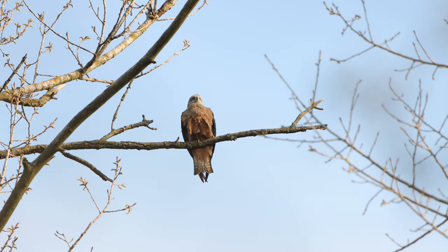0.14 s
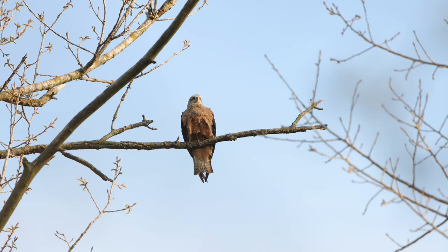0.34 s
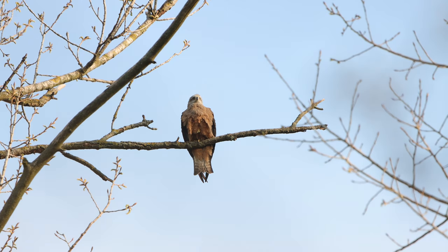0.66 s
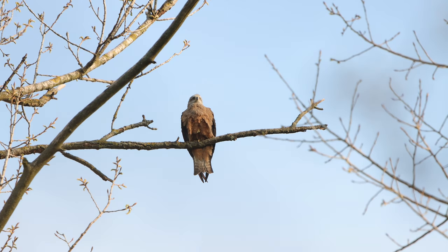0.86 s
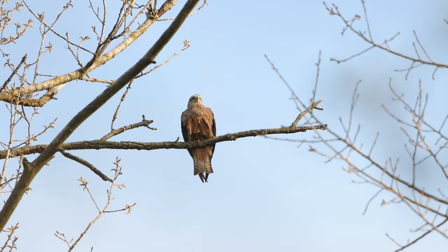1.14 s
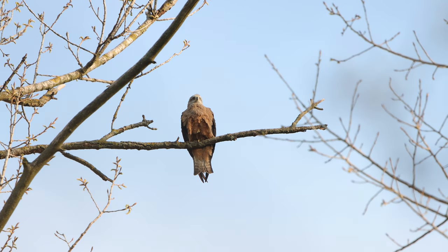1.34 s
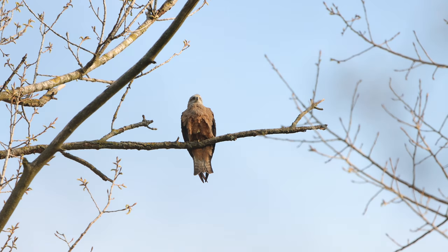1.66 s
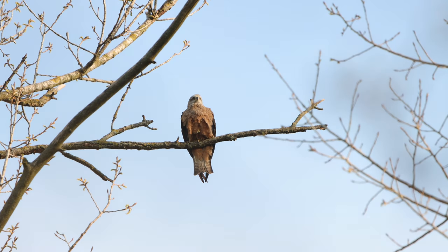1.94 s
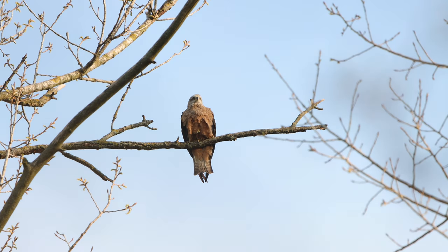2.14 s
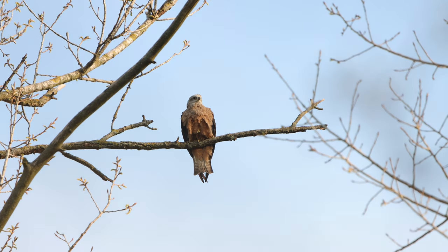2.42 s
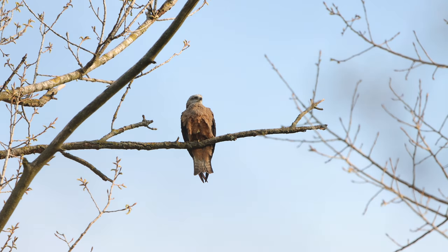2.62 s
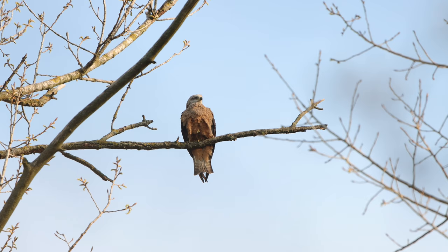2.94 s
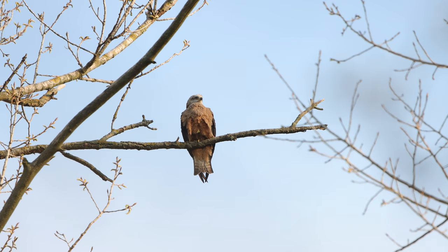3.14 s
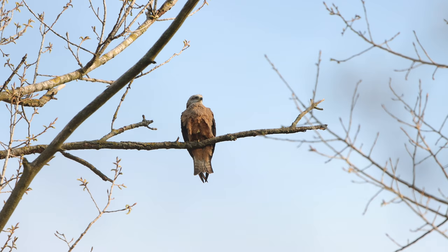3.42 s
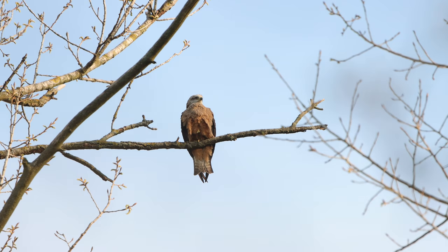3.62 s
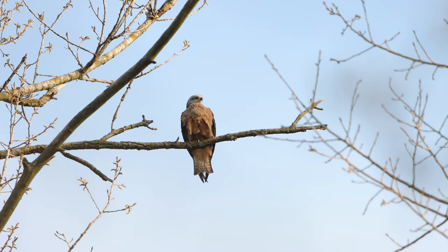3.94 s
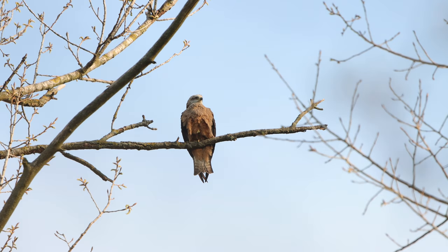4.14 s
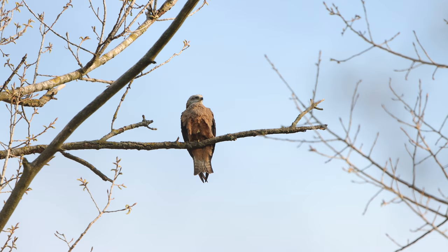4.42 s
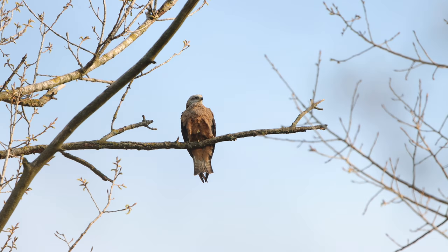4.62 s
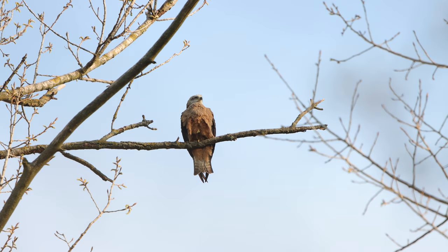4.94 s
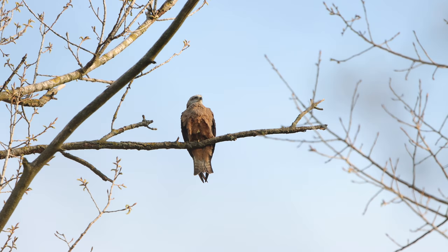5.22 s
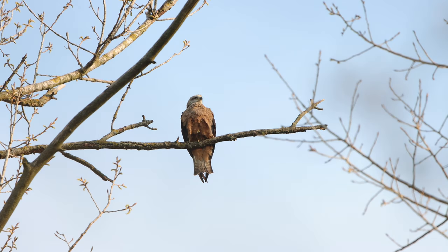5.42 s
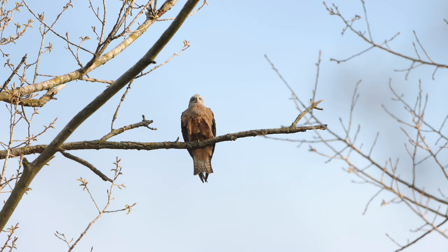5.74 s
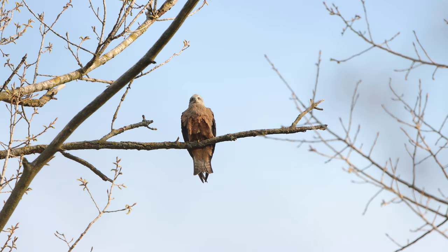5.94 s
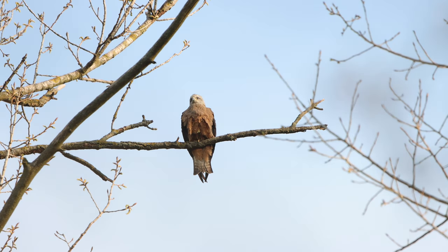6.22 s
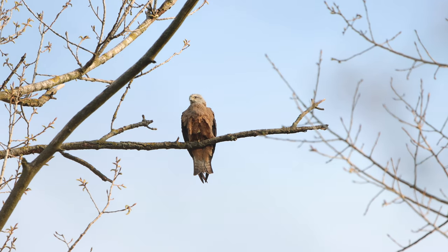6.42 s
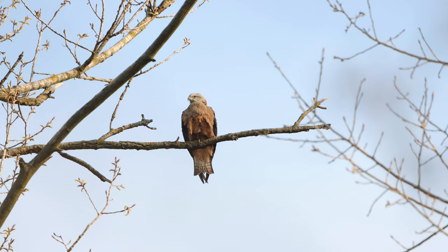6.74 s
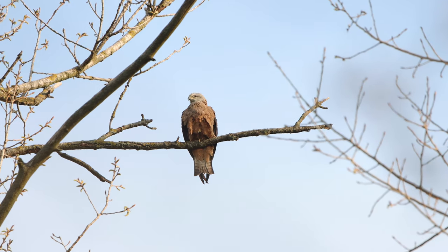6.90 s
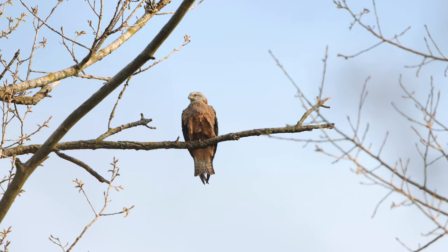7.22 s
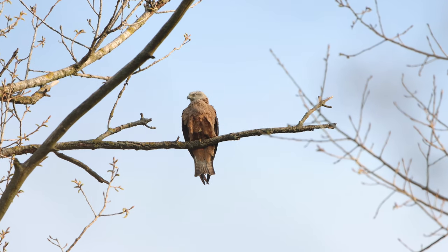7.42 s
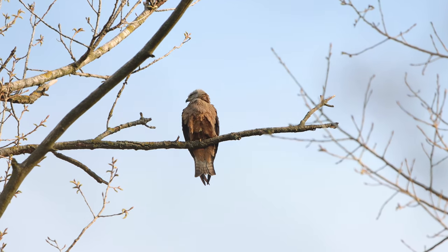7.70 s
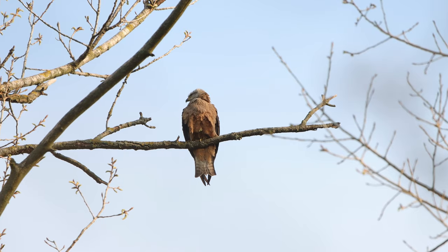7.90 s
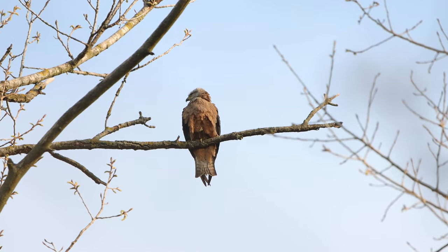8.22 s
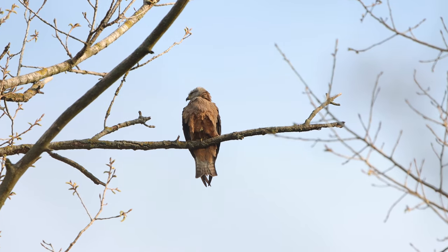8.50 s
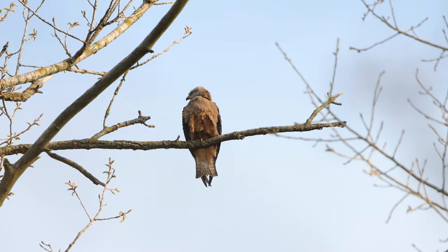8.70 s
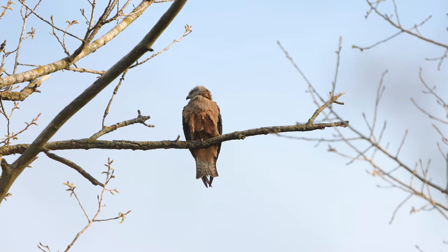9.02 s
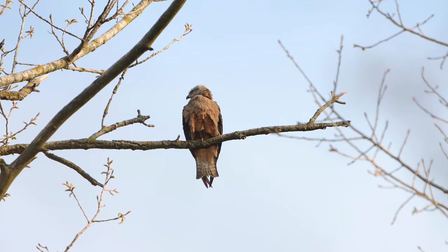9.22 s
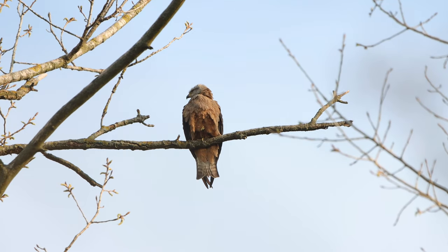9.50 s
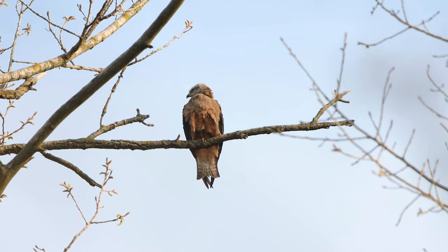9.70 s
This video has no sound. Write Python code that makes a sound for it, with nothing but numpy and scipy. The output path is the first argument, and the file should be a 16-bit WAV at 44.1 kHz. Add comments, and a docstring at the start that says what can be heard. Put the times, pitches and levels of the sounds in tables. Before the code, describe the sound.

In open air among bare trees, a low far engine tone wavers in strength throughout, with a soft drifting traffic rumble and faint wide hiss. At 0 s three quick thin falling whistles sound. From 0.3 s the nearest bird begins with small upsweeps and peeps, alternates zigzags and falling slurs from 0.9 to 1.5 s, rises to three loud arched whistles at 1.6-2 s, and ends in a buzz and quaver near 2.4 s. From 2.4 to 4 s another bird, to the left, repeats a clear high note and lower fluttering note four times, over thin whistles and a short rising buzz near 3.7 s. Faint far calls and a pulsing whistle fill 4-6 s, with a tiny twig tick near 5.8 s. The near phrase returns louder from 6.1 to 8.5 s, arches at 7.6-7.9 s, buzz at 8.3 s. Thin faint whistles and ticks last until nearly 10 s, with natural woodland reverberation.

```python
"""Among bare trees, thin falling whistles open; nearest the microphones a bird gives a long phrase of upsweeps,
zigzags with falling slurs, loud arches and a closing buzz. A see-saw of two notes follows, off to the left, over
soft slurs, a short buzz and far calls; then the near phrase returns, louder, and thin whistles last to the end.
Voices are wavering tones scattered by trunks and twigs, with a few ticks of wood. Throughout lie an engine's
low tone, traffic as a drifting band of noise, and the rumble and hiss of shaped noise."""
import sys
import numpy as np
from scipy import signal
from scipy.fft import rfft, irfft, next_fast_len
from scipy.io import wavfile
from scipy.ndimage import uniform_filter1d, map_coordinates

SR = 44100
rng = np.random.default_rng(int(sys.argv[2]) if len(sys.argv) > 2 else 0)


def output_pcm(signal):
    """Save a mono or channel-first signal as 16-bit PCM at the path in sys.argv[1].

    Samples are clipped to [-1, 1] before scaling.
    """
    pcm = np.clip(np.atleast_2d(signal).T, -1, 1) * 32767
    wavfile.write(sys.argv[1], SR, np.round(pcm).astype(np.int16))


N = 434826  # samples in the scene


def amp(db):
    """Decibels to a linear factor."""
    return 10 ** (np.asarray(db) / 20)


def unit(x):
    """Scale to an RMS of one."""
    return x / np.sqrt(np.mean(x ** 2) + 1e-20)


def along(points, hz):
    """Read (frequency [Hz], value) points on a log frequency axis."""
    f, v = np.transpose(points)
    return np.interp(np.log(hz + 1), np.log(f + 1), v)


def curves(rows):
    """One value per sample of the whole scene for each column after the time."""
    s, *cols = np.transpose(rows)
    return [np.interp(np.arange(N) / SR, s, c) for c in cols]


def gesture(rows, size=110):
    """One note's columns per sample, with the corners rounded as muscles would (size in samples)."""
    s, *cols = np.transpose(rows)
    t = np.arange(s[0], s[-1], 1 / SR)
    return [uniform_filter1d(np.interp(t, s, c), size) for c in cols]


def wobble(rate, n):
    """A smooth random curve of n samples, rate knots a second."""
    knots = rng.standard_normal(int(n * rate / SR) + 4)
    return map_coordinates(knots, [np.arange(n) * rate / SR])


def filtered(x, response):
    """Multiply the spectrum of x by a response of frequency."""
    m = next_fast_len(N + SR // 2)
    return irfft(rfft(x, m) * response(np.fft.rfftfreq(m, 1 / SR)), m)[..., :N]


def add(track, s, sound):
    """Mix a sound into a track at time s."""
    part = track[round(s * SR):][:len(sound)]
    part += sound[:len(part)]


ATTACK_S = .0028  # soft edge of a note


def whistle(hz, db, jitter=0.012, second_db=-45, third_db=-46, release_s=ATTACK_S):
    """The syrinx: a nearly pure tone whose pitch wavers by a share (jitter) and whose edges are soft."""
    n = len(hz)
    t = np.arange(n) / SR
    phase = 2 * np.pi * np.cumsum(hz * (1 + jitter * wobble(900, n))) / SR
    edges = np.clip(np.minimum(t / ATTACK_S, t[::-1] / release_s), 0, 1)
    gate = np.sin(np.pi / 2 * edges) ** 2
    tone = np.sin(phase) + amp(second_db) * np.sin(2 * phase) + amp(third_db) * np.sin(3 * phase)
    return np.sqrt(2) * amp(db) * gate * tone


def glide(length, start_hz, end_hz, db, sag, crest, start_db, end_db):
    """Pitch and level of a note: sag above 1 bends the pitch early, below 1 late; db holds at the crest."""
    u = np.linspace(0, 1, int(length * SR))
    before = start_db * (1 - u / crest) ** 2
    after = end_db * ((u - crest) / (1 - crest)) ** 2
    return end_hz + (start_hz - end_hz) * (1 - u) ** sag, db + np.where(u < crest, before, after)


def flutter(rate_hz, n, unrest):
    """The pitch or level shake of a buzzing or pulsing note, its rate wandering by a share (unrest)."""
    return np.sin(2 * np.pi * np.cumsum(rate_hz * (1 + unrest * wobble(60, n))) / SR)


# how long the trees ring on: (frequency [Hz], time to fall 60 dB [s])
TREE_DECAY = [(1500, 0.24), (3500, 0.55), (7000, 0.78), (14000, 0.98)]


def woods(x, pan_db, twigs_db, tail_db, twigs_t60):
    """Direct sound, a dense quick scatter from nearby branches and the slower answer of the trees."""
    hz, t, z = signal.stft(rng.standard_normal((2, SR)), SR, nperseg=256)
    decay = amp(-60 * t / along(TREE_DECAY, hz)[:, None])
    build_up = 1 - np.exp(-t / 0.0042)
    tail = signal.istft(z * decay * build_up, SR, nperseg=256)[1]

    lag = np.arange(tail.shape[1]) / SR
    scatter = rng.standard_normal(tail.shape) * amp(-60 * lag / twigs_t60) * (1 - np.exp(-lag / 0.0027))

    # scatter and tail are set in dB against the direct sound
    paths = amp(tail_db) * tail / np.linalg.norm(tail[0])
    paths += amp(twigs_db) * scatter / np.linalg.norm(scatter[0])
    paths[:, 0] += 1
    # positive pan_db leans left
    return signal.fftconvolve(x[None], paths, axes=1)[:, :N] * amp([[pan_db / 2], [-pan_db / 2]])


def near_bird():
    """Closest to the microphones: two phrases grow from thin upsweeps to loud arches and end in a buzz."""
    voice = opening() + trill() + arches() + closing() + asides()
    # the pressure behind the notes is uneven, so each stroke trembles in its own way
    voice *= amp(0.71 * wobble(160, N))
    # a faint bright hiss, shaped noise, follows the level of the notes
    loudness = np.sqrt(np.abs(uniform_filter1d(voice ** 2, size=220)))
    bright = [(800, -2.0), (8000, 7), (13000, 2)]  # (frequency [Hz], gain [dB])
    hiss = filtered(rng.standard_normal(N), lambda hz: amp(along(bright, hz)))
    voice += amp(-42) * loudness * hiss
    return woods(voice, pan_db=-2.0, twigs_db=-3.5, tail_db=-8.5, twigs_t60=0.1)


def slur(length, start_hz, end_hz, db):
    """A clean falling note, its pitch dropping fastest at the start."""
    return whistle(*glide(length, start_hz, end_hz, db, sag=1.7, crest=0.32, start_db=-15.5, end_db=-21.5))


def rasp(length, end_hz, db, start_hz=2200):
    """A rising note made rough by strong random pitch wavering."""
    note = glide(length, start_hz, end_hz, db, sag=1.5, crest=.5, start_db=-6.5, end_db=-9)
    return whistle(*note, jitter=0.12, second_db=-25)


# shape of an upsweep about its knee: (time from the knee [s], pitch [Hz], relative level [dB])
UPSWEEP_SHAPE = [(-.034, 5650, -9.5), (-.012, 5500, 4.5), (0, 5750, 5.5), (.008, 7200, -5),
                 (0.012, 7750, -9.5), (0.026, 6700, 3)]
# upsweeps, each led by a rasp: (time of the knee [s], level [dB], pitch [ratio], rasp level [dB])
UPSWEEP_NOTES = [(.377, -42.5, 1.0, -50.5), (.533, -34, .96, -40), (6.188, -45, 1.105, -49),
                 (6.357, -37.5, 1, -41), (6.506, -35, 1.016, -42)]
RASP_LEAD_S, RASP_S, RASP_TO_HZ = .061, 0.011, 4390
# quick falling peeps: (time [s], level of the first [dB], start pitch [Hz], end pitch [Hz])
PEEPS = [(.631, -28.5, 5380, 4683), (6.595, -27.5, 5110, 4440)]
PEEP_EVERY_S, PEEP_S, PEEP_GROWS_DB = .0455, 0.0281, 5


def opening(count=3):
    """Rasps and thin upsweeps, then a run of peeps of which the first is softer."""
    voice = np.zeros(N)
    hz, db = gesture(UPSWEEP_SHAPE)
    for s, level, ratio, rasp_db in UPSWEEP_NOTES:
        add(voice, s - RASP_LEAD_S, rasp(RASP_S, RASP_TO_HZ, rasp_db))
        add(voice, s + UPSWEEP_SHAPE[0][0], whistle(hz * ratio, db + level, second_db=-25))
    for s, level, start_hz, end_hz in PEEPS:
        for k in range(count):
            peep_db = level + PEEP_GROWS_DB * (k > 0)
            add(voice, s + k * PEEP_EVERY_S, slur(PEEP_S, start_hz, end_hz, peep_db))
    return voice


# shape of a zigzag about its lowest turn: (time from the turn [s], pitch [Hz], relative level [dB])
ZIGZAG_SHAPE = [(-.036, 5700, -27), (-.027, 7000, -23), (-.019, 6200, -20), (-.015, 5800, -8),
                (-.006, 5300, -10), (-.003, 4500, -2), (0, 3350, 0), (.003, 4500, 1), (.008, 4850, -2),
                (.015, 4550, -17)]
# zigzags, each followed by a falling slur: (time of the turn [s], zigzag level [dB], time from the turn
# to the slur [s], slur length [s], slur start pitch [Hz], slur end pitch [Hz], slur level [dB])
ZIGZAG_SLURS = [ (0.88, -21.5, .025, .036, 4170, 3190, -18), (1.028, -25, .023, .031, 4090, 2783, -15.5),
                (1.171, -25, .026, 0.033, 3937, 2670, -17), (1.308, -26, 0.032, .038, 4037, 2610, -17.5),
                (1.453, -23, .023, .042, 4510, 2455, -18), (6.811, -25, .024, .05, 4100, 3394, -20),
                (6.972, -24.5, 0.026, .03, 4106, 3252, -17.5),
                (7.130, -22.5, .029, .028, 4110, 2950, -14.5), (7.278, -18, .023, 0.042, 4024, 2643, -14),
                (7.42, -17, 0.032, .027, 4500, 2710, -11)]


def trill():
    """Zigzag and slur alternate, the slurs mostly reaching lower as the phrase goes on."""
    voice = np.zeros(N)
    hz, db = gesture(ZIGZAG_SHAPE)
    for s, level, slur_after, *fall in ZIGZAG_SLURS:
        add(voice, s + ZIGZAG_SHAPE[0][0], whistle(hz, db + level, jitter=0.05, second_db=-34))
        add(voice, s + slur_after, slur(*fall))
    return voice


# an arch holds low, climbs and drops: (time from the drop [s], pitch [Hz], relative level [dB])
ARCH_SHAPE = [(-.069, 3150, -14), (-.052, 3060, -5), (-.045, 3080, -5), (-.037, 3220, 1), (-.025, 3800, 0),
              (-.017, 4850, -4), (-.011, 5050, -3), (-.004, 5050, -5), (.004, 3450, -1), (.013, 2720, -6),
              (.022, 2350, -18), (.033, 1800, -34)]
# three arches crown each phrase: (time of the drop [s], climb stretch [ratio], drop stretch [ratio],
# level [dB], lift of the top [Hz], change at the top [dB], change in the low lead-in [dB], flick level [dB])
ARCHES = [(1.661, 0.99, 1.1, -18.5, 377.5, -14.5, -12, -39.5),
          (1.839, 1.11, 1.1, -19, 401.5, -13.5, -10.5, -44),
          (1.991, 0.88, 1.05, -18.5, 86.5, -4, -3.5, -39), (7.614, 0.93, 1.03, -12.5, 60, 1, -3, -23),
          (7.78, 1.03, 1.08, -12, -77.5, 1, 2.5, -19.5), (7.94, 0.91, 1, -12.5, 28.5, -1, 0.5, -25)]
# a steep downward flick leads each arch; its lead stretches with the climb
FLICK_LEAD_S, FLICK_S, FLICK_FROM_HZ, FLICK_TO_HZ = .079, 0.0044, 8300, 4500


def arches(top_from_hz=3600, top_hz=5000):
    """A flick, then a loud arch whose top varies in height and strength."""
    voice = np.zeros(N)
    t, pitch, shape_db = np.transpose(ARCH_SHAPE)
    for s, climb, drop, level, lift_hz, top_db, lead_db, flick_db in ARCHES:
        stretched = t * np.where(t < 0, climb, drop)
        hz, db = gesture(np.transpose([stretched, pitch, shape_db]))
        top = np.clip((hz - top_from_hz) / (top_hz - top_from_hz), 0, 1)
        lead = np.interp(t[0] + np.arange(len(hz)) / SR / climb, t[2:4], [1, 0])
        db = db + level + top_db * top + lead_db * lead
        add(voice, s - climb * FLICK_LEAD_S, slur(FLICK_S, FLICK_FROM_HZ, FLICK_TO_HZ, flick_db))
        add(voice, s + climb * t[0], whistle(hz + lift_hz * top, db, jitter=0.012))
    return voice


BUZZ_RATE_HZ, QUAVER_RATE_HZ = 172, 60
# rough rising squeaks after the arches: (time [s], length [s], end pitch [Hz], level [dB])
SQUEAK_NOTES = [(2.075, 0.039, 8330, -36.5), (2.162, .026, 7530, -37), (8.027, .014, 7210, -26.5),
                (8.106, 0.0079, 6750, -29)]
# the closing buzz, an arch sinking into a low quaver: (time from the drop [s], pitch [Hz], relative level [dB])
BUZZ_SHAPE = [(-.064, 2100, -12), (-.054, 2600, 1), (-.046, 3200, -6), (-.027, 4450, -3), (-.004, 4500, -8),
              (.004, 3260, 1), (.021, 2360, -1), (.036, 2520, -6), (.085, 2370, -7), (.125, 2290, -10),
              (.147, 2100, -31)]
# a buzzing slur and the buzz close each phrase: (time of the drop [s], level [dB], change in the climb [dB],
# brief change within the climb [dB], slur start pitch [Hz], slur level [dB])
CLOSING_NOTES = [(2.388, -23, -2.5, -12.5, 3780, -21.5), (8.333, -19.5, -1, 0, 4440, -15.5)]
BUZZ_SLUR_LEAD_S, BUZZ_SLUR_S, BUZZ_SLUR_TO_HZ = .141, .044, 2580
BUZZ_SWING, SLUR_SWING, QUAVER_SWING = .16, .04, .07  # shares of the pitch
BUZZ_BUILDS_S, QUAVER_AFTER_S = .025, .021
QUAVER_SWING_DB, QUAVER_ROUGH = 3, .05  # level swing; added pitch jitter as a share
CATCH_LEAD_S, CATCH_S = .044, .007  # the brief level change: time before the drop, width


def closing():
    """Squeaks, a buzzing slur, then an arch that buzzes as it climbs, drops cleanly and ends in a rough quaver."""
    voice = np.zeros(N)
    for s, length, end_hz, level in SQUEAK_NOTES:
        add(voice, s, rasp(length, end_hz, level))
    for s, level, climb_db, catch_db, slur_hz, slur_db in CLOSING_NOTES:
        hz, db = glide(BUZZ_SLUR_S, slur_hz, BUZZ_SLUR_TO_HZ, slur_db,
                       sag=.85, crest=.45, start_db=-14, end_db=-14)
        shake = SLUR_SWING * flutter(BUZZ_RATE_HZ, len(hz), unrest=.06)
        add(voice, s - BUZZ_SLUR_LEAD_S, whistle(hz * (1 + shake), db))

        hz, db = gesture(BUZZ_SHAPE)
        t = BUZZ_SHAPE[0][0] + np.arange(len(hz)) / SR
        climb = np.clip(-t / .005, 0, 1)
        tail = np.clip((t - QUAVER_AFTER_S) / .005, 0, 1)
        build = np.clip((t - t[0]) / BUZZ_BUILDS_S, 0, 1)
        buzz = climb * build * flutter(BUZZ_RATE_HZ, len(t), unrest=.1)
        quaver = tail * flutter(QUAVER_RATE_HZ, len(t), unrest=.3)
        catch = np.exp(-((t + CATCH_LEAD_S) / CATCH_S) ** 2)
        db = db + level + climb_db * climb + catch_db * catch - QUAVER_SWING_DB * quaver
        hz = hz * (1 + BUZZ_SWING * buzz + QUAVER_SWING * quaver)
        add(voice, s + BUZZ_SHAPE[0][0], whistle(hz, db, jitter=0.017 + QUAVER_ROUGH * tail))
    return voice


# soft low slurs between the phrases: (time [s], length [s], start pitch [Hz], level [dB])
SOFT_SLURS = [(3.325, 0.032, 2950, -48.5), (4.483, .044, 3180, -41)]
# a lone rising buzz: (time [s], pitch [Hz], flutter swing [Hz], level [dB])
RISING_BUZZ = [(3.648, 2207, 150, -41), (3.668, 3060, 598, -43), (3.685, 3670, 241, -32),
               (3.698, 4240, 100, -32.5), (3.720, 4300, 60, -34)]


def asides():
    """Soft falling slurs and one fluttering, rising note in the pause between the phrases."""
    voice = np.zeros(N)
    for s, length, start_hz, level in SOFT_SLURS:
        add(voice, s, slur(length, start_hz, end_hz=2250, db=level))
    hz, swing, db = gesture(RISING_BUZZ)
    shaken = hz + swing * flutter(BUZZ_RATE_HZ, len(hz), unrest=.06)
    add(voice, RISING_BUZZ[0][0], whistle(shaken, db, jitter=0.0098))
    return voice


# pairs of notes: (time [s], high note length [s], high note level [dB], low note level [dB])
SEESAW_PAIRS = [(2.374, 0.08, -19.5, -29), (2.829, .13, -21, -28.5), (3.271, 0.093, -14, -24),
                (3.713, 0.11, -14, -26.5)]
SEE_FROM_HZ, SEE_TO_HZ, SAW_AFTER_S = 4626, 4434, 0.19
SEESAW_LEAD_S, SEESAW_RELEASE_S = 7e-5, .02  # lead between the microphones; end of a note


def seesaw_bird():
    """Off to the left, a clear high note alternates with a lower, finely fluttering one that swells and tapers."""
    high, low = np.zeros(N), np.zeros(N)
    for s, length, high_db, low_db in SEESAW_PAIRS:
        note = glide(length, SEE_FROM_HZ, SEE_TO_HZ, high_db, sag=4.5, crest=.35, start_db=-9, end_db=-11)
        add(high, s, whistle(*note, jitter=0.0012, second_db=-39, third_db=-40.5, release_s=SEESAW_RELEASE_S))
        hz, db = glide(.11, 3060, 3010, low_db, sag=1.5, crest=.53, start_db=-14, end_db=-14)
        shaken = hz + 110 * flutter(219.5, len(hz), unrest=0.069)
        add(low, s + SAW_AFTER_S, whistle(shaken, db, jitter=0.0054, release_s=SEESAW_RELEASE_S))
    both = woods(high, pan_db=7, twigs_db=-10, tail_db=-10, twigs_t60=.2)
    both = both + woods(low, pan_db=1.0, twigs_db=-4.5, tail_db=-4.5, twigs_t60=0.085)
    # it sits to one side, so its song reaches the left microphone first
    sides = np.array([[1], [-1]])
    return filtered(both, lambda hz: np.exp(1j * np.pi * hz * SEESAW_LEAD_S * sides))


# runs of quick thin falling notes: (time [s], level [dB])
QUICK_FALLS = [(0, -34), (.085, -35.5), (.195, -38), (2.646, -32.5), (2.736, -31.5), (2.83, -35),
               (2.938, -36.5)]
FALL_S, FALL_FROM_HZ, FALL_TO_HZ = 0.057, 7300, 5930
# a sag drops quickly and then settles: (position [share of its length], pitch [Hz], relative level [dB])
SAG_SHAPE = [(0, 7960, -6), (.18, 7493, -1.5), (.6, 7200, -1.5), (1, 7010, -0.5)]
# thin whistles that sag: (time [s], length [s], level [dB])
SAGGING_WHISTLES = [(1.466, 0.042, -45.5), (2.118, .17, -33), (2.386, .17, -33.5), (7.185, .11, -46),
                    (7.40, 0.1, -43.5), (7.61, .11, -45), (8.05, .045, -39.5), (8.160, .085, -40.5),
                    (8.360, 0.098, -42), (8.553, .11, -40.5), (8.785, .2, -55)]
# stray faint calls: (time [s], length [s], start pitch [Hz], end pitch [Hz], level [dB],
# pitch unrest [share of the pitch])
STRAY_CALLS = [(4.821, 0.123, 3610, 3550, -69, 0.011), (5.659, 0.061, 4535, 4354, -62, 0.0091),
               (4.978, 0.1, 5070, 5300, -56.5, 0.0092), (5.114, 0.086, 4470, 3980, -54.5, 0.015),
               (5.96, .08, 4006, 4650, -61, 0.013), (6.025, 0.038, 5130, 5800, -60, .015),
               (6.077, 0.17, 5600, 3960, -59.5, 0.019), (8.75, .14, 5140, 5840, -46, .025),
               (8.763, 0.17, 3503, 3543, -59, 0.014), (8.994, .06, 2960, 2890, -59.5, .015),
               (9.068, 0.022, 4700, 6070, -57.5, .01), (9.262, .12, 4490, 3950, -58, 0.0088),
               (9.328, 0.15, 7160, 7160, -50, 0.0029)]


def thin_birds():
    """High whistles from further off, with more of the trees in them; quick notes waver more than long ones."""
    voice = np.zeros(N)
    for s, level in QUICK_FALLS:
        note = glide(FALL_S, FALL_FROM_HZ, FALL_TO_HZ, level, sag=1.5, crest=0.89, start_db=-1, end_db=-12)
        add(voice, s, whistle(*note, jitter=0.025))
    for s, length, level in SAGGING_WHISTLES:
        hz, db = gesture(np.array(SAG_SHAPE) * [length, 1, 1])
        add(voice, s, whistle(hz, db + level, jitter=0.0097))
    for s, *row, unrest in STRAY_CALLS:
        note = glide(*row, sag=1.6, crest=.55, start_db=-7, end_db=-7)
        add(voice, s, whistle(*note, jitter=unrest))
    return woods(voice, pan_db=-3.5, twigs_db=0, tail_db=-8, twigs_t60=0.32)


# hoarse calls from far away: (time [s], level [dB])
HOARSE_CALLS = [(3.0, -68), (3.65, -69), (4.3, -70)]


def far_birds(count=4):
    """Almost lost among the trees: a pulsing whistle, randomly placed chirps and low, unsteady hoarse calls."""
    voice = np.zeros(N)
    hz, db = glide(0.68, 5050, 5000, -62.5, sag=0.95, crest=0.92, start_db=-1.5, end_db=1)
    add(voice, 3.95, whistle(hz, db + 6 * flutter(9.4, len(hz), unrest=.05)))
    for when, length, pitch, fall in rng.random((count, 4)):
        start_hz = 3200 + 1900 * pitch
        end_hz = start_hz * (1.08 - 0.93 * fall)
        note = glide(0.0496 + 0.097 * length, start_hz, end_hz, -68.5,
                     sag=1, crest=0.2, start_db=-3.0, end_db=-16.0)
        add(voice, 4 + 5.7 * when, whistle(*note, jitter=.03))
    for s, level in HOARSE_CALLS:
        note = glide(0.55, 1210, 1170, level, sag=0.81, crest=0.36, start_db=2, end_db=-13.5)
        add(voice, s, whistle(*note, jitter=0.072))
    return woods(voice, pan_db=-2.5, twigs_db=-21.0, tail_db=-1, twigs_t60=.2)


# faint ticks in the twigs: (time [s], level [dB])
TWIG_TICKS = [(.27, -46.5), (5.812, -44), (8.968, -52.5), (9.132, -49.5)]


def twigs():
    """Small dull ticks of wood: short decays of noise shaped around a woody resonance."""
    push, t = np.zeros(N), np.arange(SR // 10) / SR
    for s, db in TWIG_TICKS:
        add(push, s, amp(db - 60 * t / 0.059))
    # (frequency [Hz], relative level [dB])
    wood = [(500, -16), (1150, 9.0), (1800, -8.5), (2600, -5.5), (5000, -12), (9000, -31.5)]
    tick = unit(filtered(rng.standard_normal(N), lambda hz: amp(along(wood, hz))))
    return woods(push * tick, pan_db=0, twigs_db=-8, tail_db=-16, twigs_t60=.08)


# the distant engine: (time [s], firing rate [Hz], level [dB])
ENGINE_DRONE = [(0.0, 76.2, -33.5), (0.11, 77.4, -31), (1.03, 77.4, -33.5), (2.05, 77.4, -29),
                (2.73, 77.4, -41), (2.89, 77.4, -34), (4.5, 77.4, -48.5), (4.64, 77.4, -39),
                (6.85, 77.3, -28.5), (7.94, 77.3, -36), (8.46, 77.3, -32.5), (8.71, 77.3, -38),
                (9.25, 77.3, -29.5), (9.8, 77.3, -44.5)]


def engine():
    """A far engine: only its firing tone and a trace of the octave carry this far."""
    hz, db = curves(ENGINE_DRONE)
    phase = 2 * np.pi * np.cumsum(hz) / SR
    tone = np.sin(phase) + amp(-26.5) * np.sin(2 * phase)
    return np.sqrt(2) * amp(db + 1.1 * wobble(10, N)) * tone


# the far traffic: (time [s], centre frequency [Hz], level of the part alike in both microphones [dB])
TRAFFIC_RUMBLE = [(0.0, 215, -46.5), (0.3, 222.6, -51.8), (0.9, 207, -64.5), (1.7, 264.2, -58.5),
                  (2.3, 219, -52.5), (3.1, 254, -50), (3.8, 253.5, -64), (4.3, 188.6, -52.5),
                  (4.85, 228.8, -45), (5.7, 252, -55.5), (6.22, 248, -49.5), (6.6, 238, -60),
                  (7.3, 212, -53), (8.3, 188.6, -52), (8.8, 215.7, -56), (9.2, 230, -53.5),
                  (9.86, 230, -59.5)]


def traffic(width_hz=55):
    """Far traffic: a soft band of rumble whose centre drifts, a little of it differing left to right."""
    hz, db = curves(TRAFFIC_RUMBLE)
    phase = 2 * np.pi * np.cumsum(hz) / SR

    def band():
        in_phase = wobble(2 * width_hz, N) * np.cos(phase)
        return unit(in_phase + wobble(2 * width_hz, N) * np.sin(phase))

    return amp(db) * (band() + amp(-14) * band() * np.array([[1], [-1]]))


# colour of the still air: (frequency [Hz], relative level per Hz [dB])
AIR_COLOUR = [(20, 2.5), (40, 8.5), (65, 7.5), (100, 1.5), (135, -12), (250, -20.5), (400, -24.5),
              (900, -27), (1800, -35), (4000, -29), (10000, -39.5), (15000, -28)]
# left-right likeness of the air: (frequency [Hz], correlation [-1 to 1])
AIR_LIKENESS = [(60, 0.9), (250, 0.86), (1000, 0.89), (3000, 0.24), (10000, .05)]


def air():
    """Rumble much alike at both microphones, stirring with the breeze; the steady hiss is almost unrelated."""
    def mid_and_side(hz):
        turn = np.arccos(np.clip(along(AIR_LIKENESS, hz), -1, 1)) / 2
        return amp(along(AIR_COLOUR, hz)) * [np.cos(turn), np.sin(turn)]

    mid, side = filtered(rng.standard_normal((2, N)), mid_and_side)
    floor = amp(-40.5) * unit(np.array([mid + side, mid - side]))
    rumble = filtered(floor, lambda hz: 1 / (1 + (hz / 700) ** 2))
    hiss = floor - rumble
    return hiss + rumble * amp(1.3 * wobble(7, N))


def scene():
    """Birds in the trees over the distant engine, traffic and air."""
    birds = near_bird() + seesaw_bird() + thin_birds() + far_birds()
    return birds + twigs() + engine() + traffic() + air()


def record(dry, top_hz=15850):
    """The recorder keeps nothing above its band limit."""
    return filtered(dry, lambda hz: hz < top_hz)


dry = scene()
out = record(dry)
output_pcm(out)
```